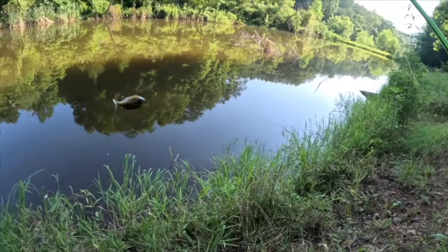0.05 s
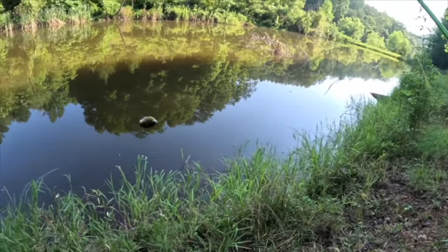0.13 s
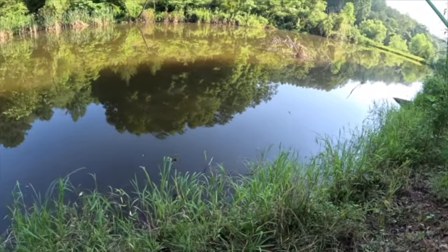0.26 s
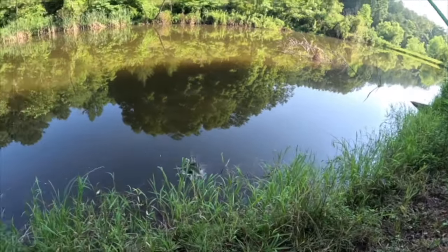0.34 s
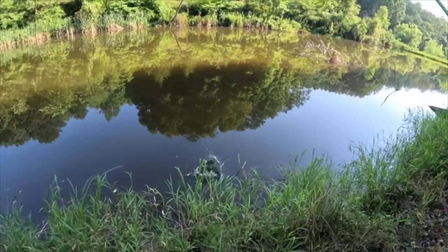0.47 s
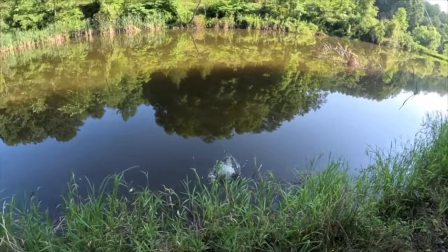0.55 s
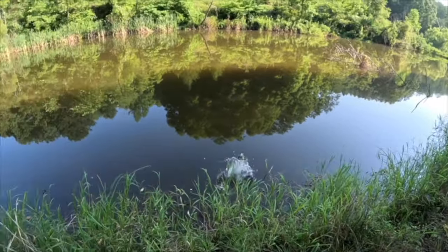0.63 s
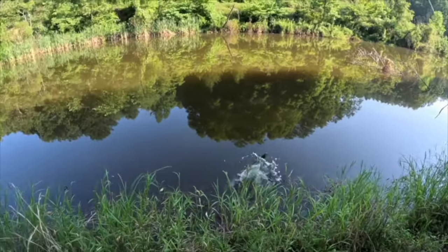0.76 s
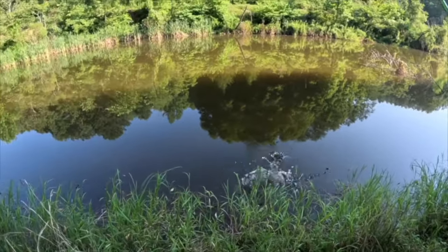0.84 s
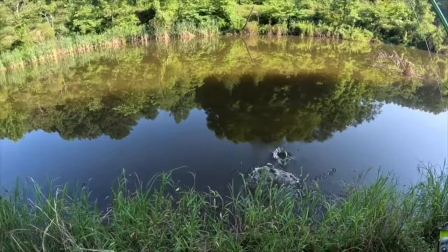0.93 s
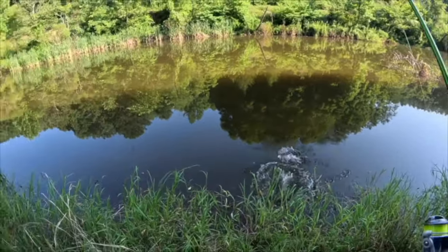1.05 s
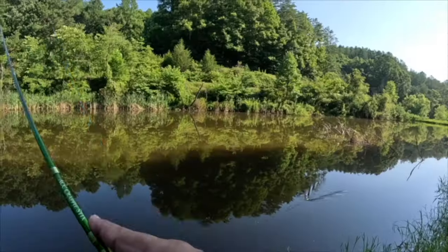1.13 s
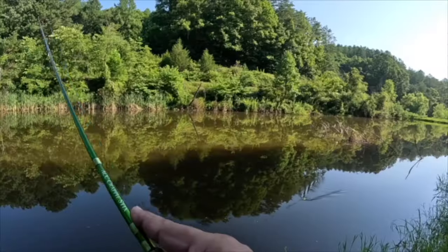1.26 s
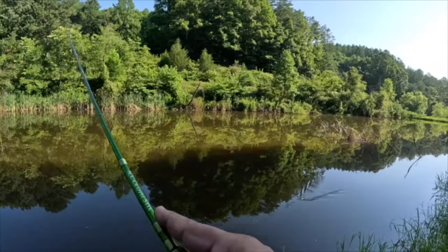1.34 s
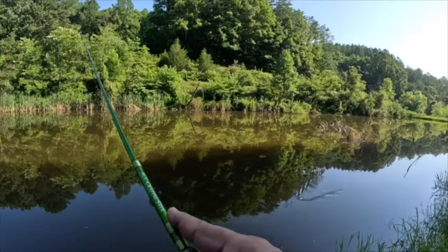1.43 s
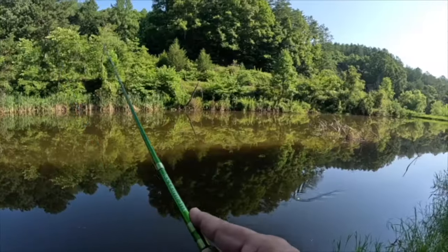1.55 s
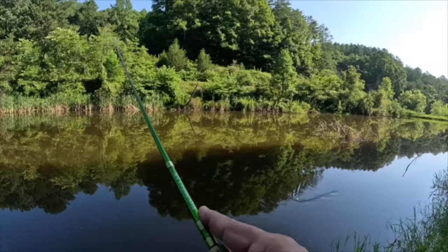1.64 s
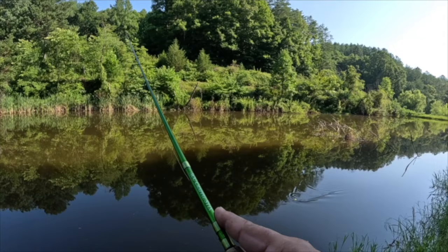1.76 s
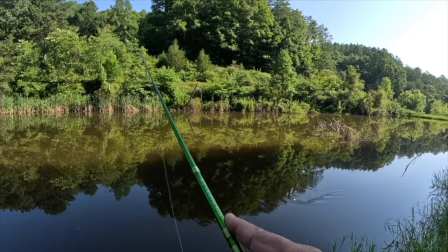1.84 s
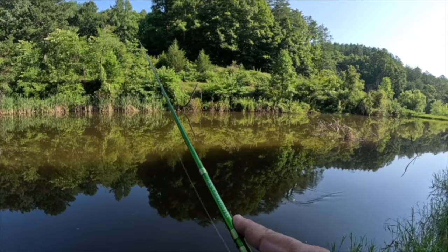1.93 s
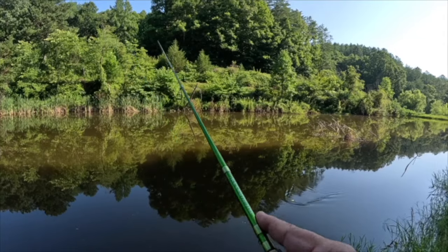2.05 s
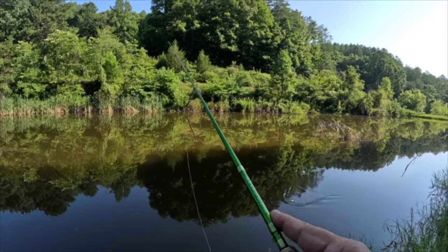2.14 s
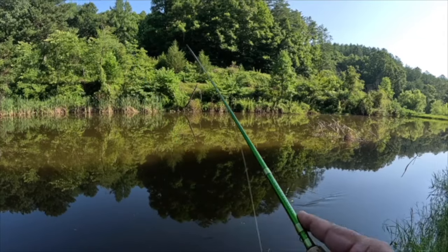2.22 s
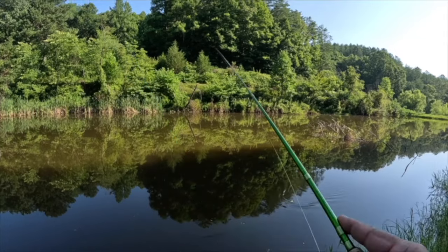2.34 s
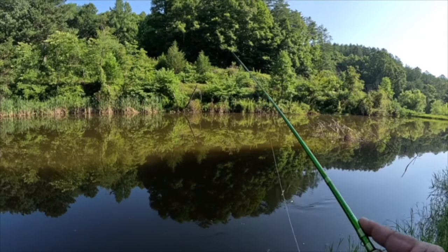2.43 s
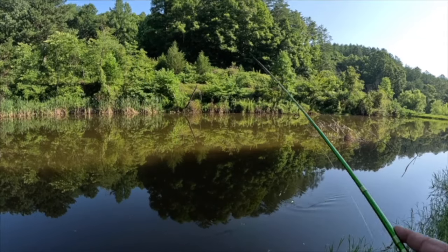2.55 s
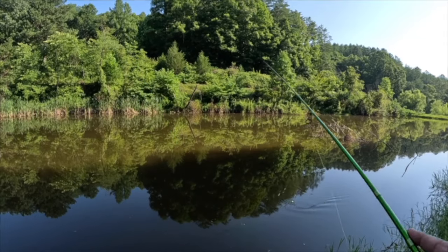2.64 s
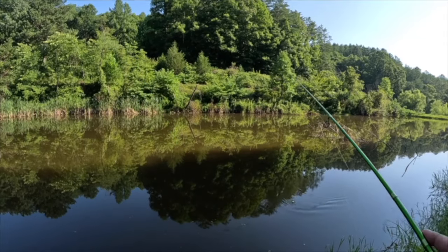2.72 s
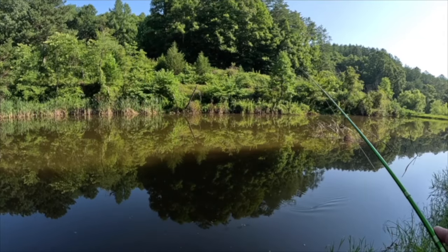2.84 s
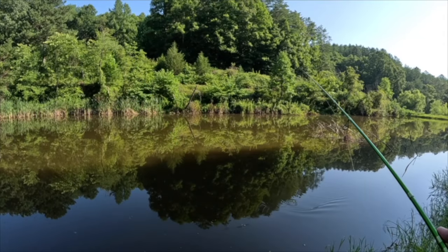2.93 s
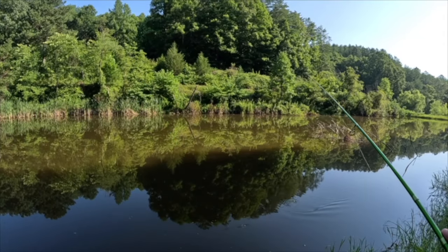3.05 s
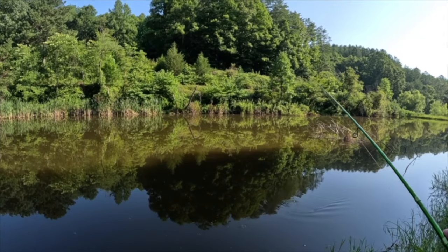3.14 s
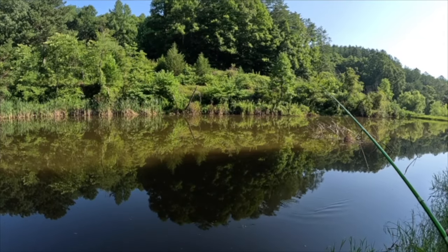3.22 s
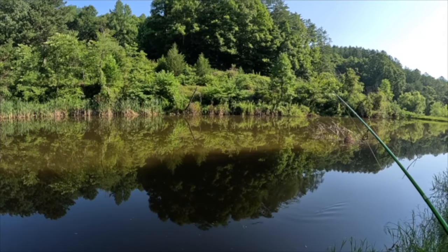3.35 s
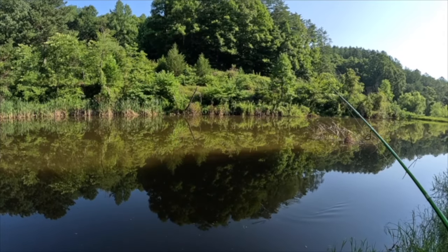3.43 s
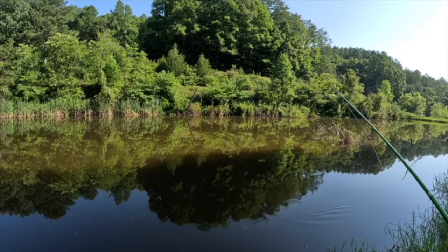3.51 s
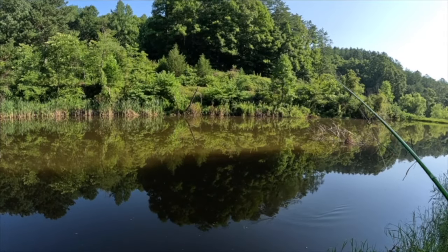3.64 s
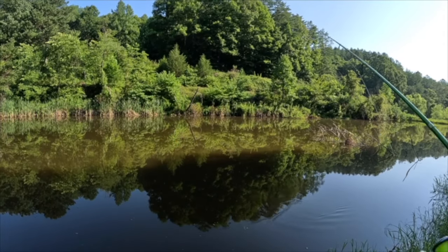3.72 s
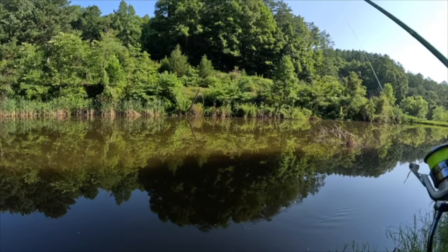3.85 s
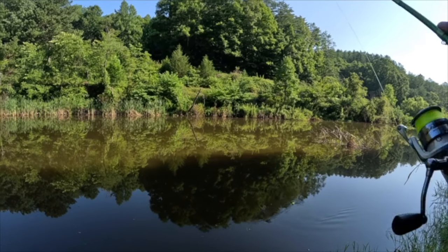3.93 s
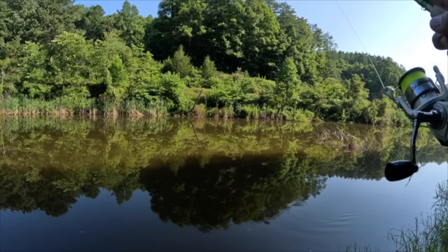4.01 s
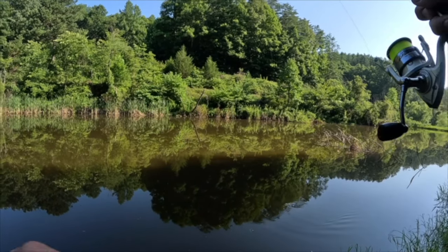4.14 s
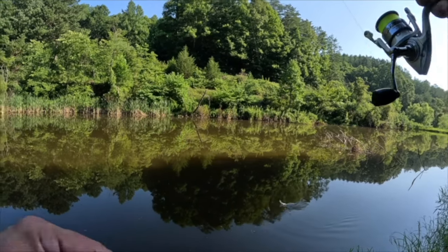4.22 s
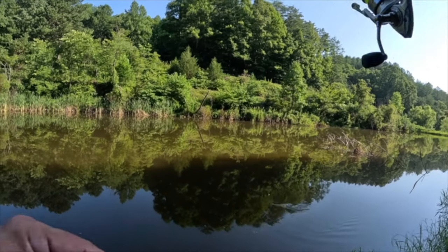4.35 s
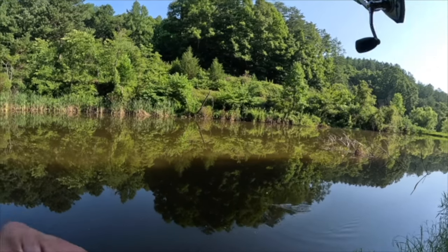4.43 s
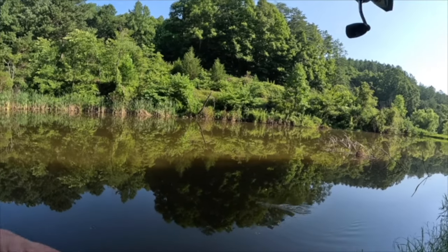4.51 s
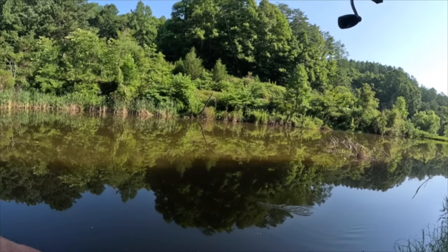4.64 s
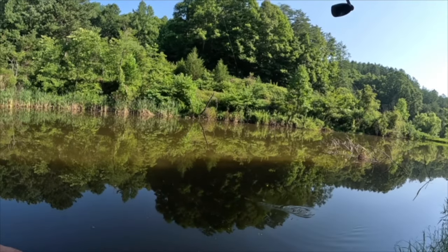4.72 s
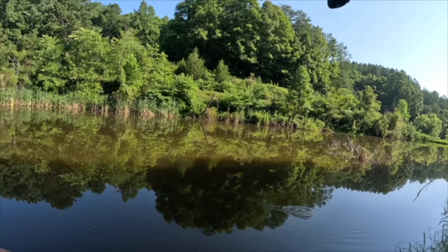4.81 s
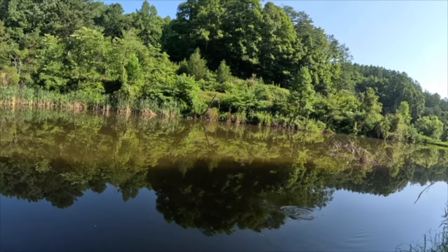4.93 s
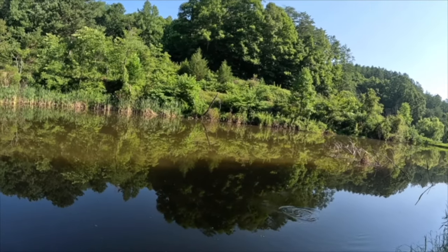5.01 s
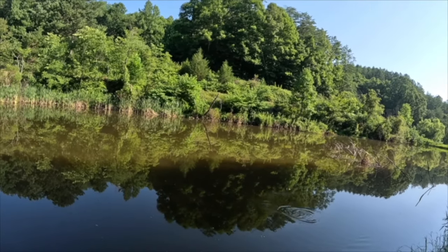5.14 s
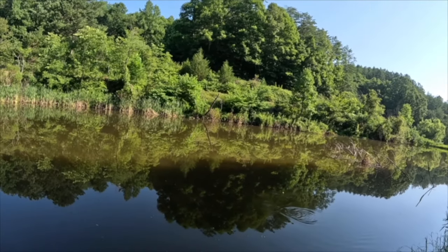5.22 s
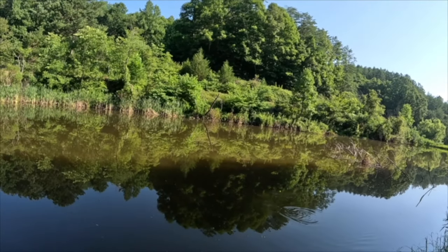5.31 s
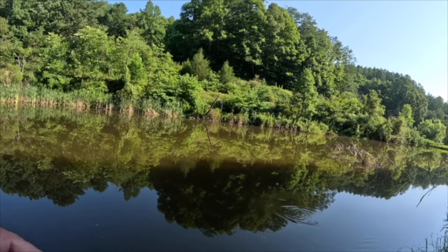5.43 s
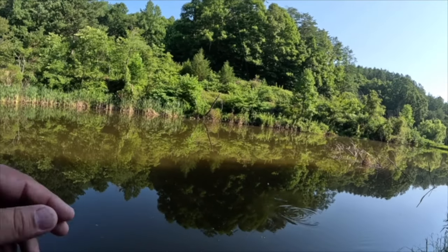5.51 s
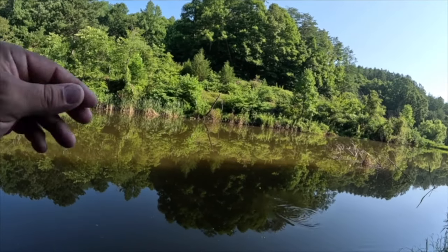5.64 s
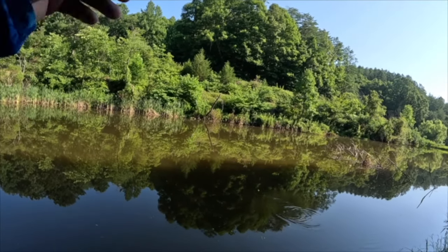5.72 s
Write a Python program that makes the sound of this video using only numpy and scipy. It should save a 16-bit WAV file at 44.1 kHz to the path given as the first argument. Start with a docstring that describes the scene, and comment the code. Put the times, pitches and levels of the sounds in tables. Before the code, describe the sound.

Loud close splash and spray cut abruptly to a calm pond bank: thin insect drone, soft bird notes, small rod clicks and distant plops.

```python
"""Fish tossed back into a pond

A fish slaps the surface in sharp noise bursts, air pockets gulp shut as gliding sines, and thrown water
rains back as ringing grains. Then a jump to a calm bank: insects in shaped noise, a pulsed frog trill, a bird
of gliding sines, a fish swirling farther out in small plops, rod and reel clicks from excited resonances,
and a far cricket. A light breeze of low noise runs under both places."""
import sys
import numpy as np
from scipy import signal
from scipy.fft import rfft, irfft
from scipy.io import wavfile
from scipy.ndimage import uniform_filter1d

SR = 44100
rng = np.random.default_rng(int(sys.argv[2]) if len(sys.argv) > 2 else 0)


def to_wav(sig):
    """Store sig (one row per channel, or 1-D mono) as 16-bit WAV at the path in sys.argv[1].

    Samples outside -1..1 are clipped; the rate is SR.
    """
    pcm = np.clip(np.atleast_2d(sig), -1, 1) * 32767
    pcm = np.round(pcm).astype(np.int16)
    wavfile.write(sys.argv[1], SR, pcm.T)  # frames by channels


N = 254456
TIME = np.arange(N) / SR  # s
BINS = np.maximum(np.arange(N // 2 + 1) * SR / N, 1)  # Hz
CHANGE_S = 1.175  # the scene jumps to a second spot on the bank

# Fish hitting the water: start_s, peak_db, decay_s, brightness_hz
SLAP_HITS = [(0.309, -13.5, 0.0019, 8970), (0.3206, -10, 0.0013, 6000), (0.3442, -19.5, 0.0011, 6960),
             (0.351, -22, 0.0029, 2453), (0.457, -16, 0.01, 4000), (0.475, -16, .009, 3003),
             (0.497, -26, 0.0034, 4450)]
# Resonances of the slapped water: centre_hz, width_hz, level_db
SLAP_RESONANCES = [(320, 280, -5), (1210, 350, -0.5), (2600, 750, -8), (4300, 550, -1.5), (9000, 2200, -12)]
# Fat drops that smack on the surface and ping briefly: start_s, pitch_hz, peak_db
FAT_DROPS = [(.638, 7000, -33), (.7715, 4600, -26), (.811, 2700, -28), (.82, 3700, -26.5),
             (.841, 3200, -29.5), (.857, 8000, -29), (.8615, 4700, -28), (0.875, 4300, -26.5),
             (.9365, 5300, -27), (0.9705, 5200, -27)]
SMACK_DECAY_S = 0.001
PING_SWELL_S, PING_DB = 0.0016, -8  # ping level against its smack
# Large air pockets: start_s, pitch_hz, peak_db, swell_s
AIR_POCKETS = [(0.4053, 1620, -25.5, 0.002), (.447, 990, -17, 0.003), (0.448, 420, -22.5, 0.0031),
               (0.4558, 350, -10.5, 0.0046), (0.453, 1310, -18.5, 0.0032), (0.4776, 364.8, -7.5, 0.003),
               (.472, 250, -17, 0.0044), (.497, 218.1, -30, 0.0099), (0.514, 1563, -25, .004),
               (.5585, 784, -20.5, 0.006), (.574, 702, -30, 0.0053), (.562, 125, -31.5, 0.0034),
               (.6615, 1410, -30, 0.0025), (.748, 434, -39.5, 0.0072), (.758, 1240, -33, 0.0011),
               (0.859, 1036, -28.5, 0.0053), (.913, 676, -29, 0.003), (.925, 1110, -26.5, 0.003),
               (.932, 927, -22, 0.0026), (0.973, 363, -35, 0.0069), (.986, 488, -31, 0.0093),
               (0.992, 1810, -33, 0.002), (1.03, 332, -46.5, 0.015), (1.07, 738, -41.5, 0.0072),
               (1.121, 1840, -29.5, 0.0013)]
POCKET_GLIDE = -0.012  # octaves per swell
# Water plunging in, stirring small bubbles and throwing spray: peak_s, bubbles_db, spray_db
PLUNGING_WATER = [(0.355, -40, -35.5), (0.406, -37, -44.5), (0.456, -28, -29), (0.48, -27, -33),
                  (0.497, -50, -31), (.522, -31, -55), (0.563, -28, -55), (0.61, -37, -47),
                  (0.764, -35.5, -66), (0.864, -53, -36.5), (0.922, -28.5, -39.5), (0.972, -31, -44),
                  (1.122, -66, -47), (1.166, -45.5, -50)]
PLUNGE_RISE_S, PLUNGE_FALL_S = 0.012, 0.017
# Spray torn off by a slap; level against the slap's peak
TEAR_DB, TEAR_RISE_S, TEAR_FALL_S = -19.5, 0.0006, 0.016
# Thrown water rains back, thickens to a peak and dies away
SHOWER_START_S, SHOWER_PEAK_S = 0.5, 0.98
SHOWER_RISE_DB_PER_S, SHOWER_FALL_DB_PER_S = 17, 125
SHOWER_SPRAY_DB, SHOWER_GURGLE_DB = -40.5, -40
# Colour of the small bubbles under the surface: pitch_hz, density_db_per_hz
GURGLE_COLOUR = [(220, -16.5), (400, -13.5), (620, -15), (950, 2), (1550, -4.5), (2200, -15.5)]
# Colour of the airborne spray: pitch_hz, density_db_per_hz
SPRAY_COLOUR = [(2000, 7.5), (2800, 3), (4100, 8), (5300, 2.5), (6200, -16.5), (8500, -5.5), (10500, -24.5),
                (14000, -50)]
# Colour of the deep churn: pitch_hz, density_db_per_hz
DEEP_COLOUR = [(170, -2), (300, -1), (520, -3.5)]
# The cavity heaves once as it closes
DEEP_DB, DEEP_PEAK_S, DEEP_RISE_S, DEEP_FALL_S = -28, 0.472, 0.017, 0.035
WATER_LOW_HZ = 140  # low cut of the splash

# Small plops of a fish farther out: start_s, length_s, pitch_hz, glide_octaves, level_db
SWIRL_PLOPS = [(3.929, 0.028, 753, 0.044, -49.5), (3.986, 0.039, 672, 0.073, -55.5),
               (4.05, 0.027, 726, 1, -54), (4.074, 0.017, 1590, 0.98, -46),
               (4.135, 0.0084, 1440, -0.12, -47.5), (4.186, 0.0093, 1760, 0.12, -51),
               (4.202, 0.0053, 1417, -.1, -47)]
# Little flicks of water around the plops: start_s, length_s, level_db
SWIRL_RIPPLES = [(3.917, .018, -53.5), (3.975, 0.032, -55.5), (4.082, 0.011, -52.5), (4.18, 0.032, -55),
                 (4.11, 0.22, -62.5)]
# Colour of the flicked water: pitch_hz, density_db_per_hz
SPATTER_COLOUR = [(900, 1), (1800, -1), (3600, -2.5)]

# Rod and reel clicks: start_s, peak_db, ring_hz
TACKLE_CLICKS = [(1.505, -34, 596), (1.6294, -28.5, 1400), (1.7108, -38.5, 590), (1.753, -36, 2480),
                 (1.7602, -24.5, 2376), (2.036, -39, 1450), (2.662, -39.5, 1040), (2.684, -43, 1610),
                 (2.7453, -35, 690), (4.8757, -21, 3780), (4.8848, -24.5, 3120), (4.888, -27.5, 3060),
                 (5.0224, -31, 4560), (5.245, -36.5, 3630), (5.2802, -27.5, 3490)]
# Resonances of the reel housing: centre_hz, width_hz, level_db
REEL_RESONANCES = [(1394, 650, 1), (4000, 1220, 4), (9900, 1100, -9.5)]
# The hand rubs on the rod grip: start_s, length_s, level_db
GRIP_RUBS = [(.19, 0.13, -55), (5.35, 0.029, -59.5)]
KNOCK_HZ = 420  # below this pitch the ring outweighs the tick
RING_CYCLES = 10.6  # cycles until a ring is 60 dB down
CONTACT_RATIO = 2.6  # top of the contact over the ring pitch: heavier parts meet more softly

# Arched bird notes: start_s, length_s, pitch_hz, glide_octaves, end_sag_octaves, level_db
BIRD_NOTES = [(1.464, 0.035, 3040, 0.16, 0.11, -53), (1.508, 0.03, 2840, -0.3, 0.14, -55),
              (1.771, 0.037, 2670, 0.054, 0.093, -54), (2.014, 0.025, 2528, -0.12, 0.1, -51),
              (2.048, 0.027, 2900, -0.024, 0.15, -57.5), (2.16, 0.052, 2330, 0.48, 0.29, -61),
              (2.285, 0.046, 2514, 0.026, 0.016, -53.5), (2.524, 0.028, 2517, 0.016, 0.021, -51.5),
              (2.571, 0.028, 3000, 0.11, .3, -49.5), (2.769, 0.034, 2520, 0.19, 0.073, -52),
              (2.916, 0.026, 2150, 0.08, 0.08, -59), (3.074, 0.029, 2380, 0.019, .13, -55),
              (3.169, 0.031, 2304, -0.059, 0.219, -59.5), (3.24, 0.0387, 4230, 0.12, 0.074, -56.5),
              (3.33, 0.019, 2750, 0.44, 0.01, -59.5), (3.402, 0.04, 2540, 0.075, 0.032, -52.5),
              (4.983, 0.037, 2920, 0.21, 0.16, -53), (5.381, 0.039, 2500, 0.33, 0.015, -52.5),
              (5.42, 0.079, 2950, 0.16, 0.011, -59)]
# Bird flicks that dive and level out: start_s, length_s, start_hz, end_hz, level_db
BIRD_FLICKS = [(1.421, 0.033, 4400, 2870, -54.5), (1.973, 0.039, 3910, 2770, -48.5),
               (2.241, 0.033, 4190, 2730, -49.5), (2.739, 0.025, 3670, 2750, -50),
               (2.814, 0.02, 3200, 2340, -51), (2.985, .042, 4500, 2740, -50.5),
               (3.5, .022, 4500, 3700, -56), (4.954, 0.024, 4300, 2350, -50.5)]
FLICK_BEND, FLICK_SWELL = 1.7, 1.0  # exponents: curvature of the dive, growth of its amplitude

# Distant frog trills: start_s, length_s, level_db
FROG_TRILLS = [(1.177, 0.24, -67), (1.631, 0.22, -65.5), (1.984, 0.252, -65.5), (2.48, 0.25, -68)]

# Colour of the insects at the first spot: pitch_hz, density_db_per_hz
FIRST_CHORUS_COLOUR = [(2000, -13.5), (3150, -9), (5300, -8), (6900, -1.5), (9000, -16.5), (15000, -49.5)]
FIRST_CHORUS_DB = -53.5
# Colour of the far chorus at the second spot: pitch_hz, density_db_per_hz
CHORUS_COLOUR = [(2550, -6), (3300, -5.5), (4000, -4.5), (5000, -0.5), (5300, -4.5), (5700, -1), (6800, -8),
                 (7550, -6), (8100, -18.5), (10000, -27.5), (15000, -46)]
CHORUS_DB, FADE_DB_PER_S = -56, 1.02  # sinks slowly after the jump
# Colour of the nearer buzz: pitch_hz, density_db_per_hz
BUZZ_COLOUR = [(5600, -49), (6100, 8), (6500, 7), (6950, -8.5), (7800, -6), (8200, -17), (10000, -26),
               (12000, -73)]
# Colour of a lower band of the buzz: pitch_hz, density_db_per_hz
UNDERTONE_COLOUR = [(3300, 0.5), (3550, 6.5), (3800, -1)]
UNDERTONE_DB = -6.5  # against the main band
BUZZ_DB, BUZZ_HOLD_S, BUZZ_FADE_DB_PER_S = -57, 2.37, 9  # holds until 2.37 s, then winds down
# Colour of the thin whine: pitch_hz, density_db_per_hz
WHINE_COLOUR = [(5150, -20), (5480, 15.5), (5680, 11.5), (6050, 3.5)]
WHINE_DB, WHINE_SWELL_DB, WHINE_PEAK_S, WHINE_SWELL_S = -66, 4.5, 5.14, 0.95  # swells once
CRICKET_START_S, CRICKET_PER_S, CRICKET_HZ, CRICKET_DB = 5.07, 12.1, 2477, -67.5

# Colour of the breeze: pitch_hz, density_db_per_hz
BREEZE_COLOUR = [(14, 10), (32, -3), (50, -11.5), (80, -19.5)]
# The breeze drops to a lull and picks up again: time_s, level_db
BREEZE_LEVEL = [(.3, -56.5), (1.7, -59.5), (2.4, -72), (3.3, -67.5), (5.6, -62.5)]
# Colour of the far rumble: pitch_hz, density_db_per_hz
RUMBLE_COLOUR = [(70, -10.5), (115, -10), (160, 4.5), (390, -9.5), (700, -16)]
# Slow course of the far rumble: time_s, level_db
RUMBLE_LEVEL = [(1.2, -70.5), (1.6, -68.5), (2.6, -63), (3.1, -71), (3.6, -68.5), (5.5, -65.5)]
# Colour of the soft rustle: pitch_hz, density_db_per_hz
RUSTLE_COLOUR = [(400, -13.5), (800, -16), (1300, -8), (1900, -15), (2600, -12.5)]
# Slow course of the soft rustle: time_s, level_db
RUSTLE_LEVEL = [(1.25, -71), (1.6, -68), (2.65, -66.5), (3.2, -69), (3.52, -75.5), (3.8, -71), (4.3, -68.5),
                (4.7, -73), (5.6, -68.5)]

# Left-right likeness of wide noise: pitch_hz, correlation (1 = identical)
STEREO_LIKENESS = [(60, 0.67), (330, 0.79), (1500, 0.52), (3300, 0.4), (7500, 0.99)]
# Lean of wide noise to the left: pitch_hz, left_minus_right_db
STEREO_LEAN = [(330, -5), (700, -3.5), (2500, 3), (3400, -3.5), (8000, 0)]
# Phase between the two microphone ports: pitch_hz, left_lead_radians
PORT_LEAD = [(250, 0), (1000, -.85), (1550, -.45), (2100, -1.0), (3900, -.15), (7500, 0)]
CUTOFF_HZ = 14900


def from_db(db):
    """Decibels to gain."""
    return 10 ** (np.asarray(db) / 20)


def rms_one(x):
    """Scale to unit power."""
    return x / np.sqrt(np.mean(x ** 2) + 1e-20)


def in_time(rows):
    """Draw a level curve sample by sample from its (time, level) points."""
    s, level = np.transpose(rows)
    return np.interp(TIME, s, level)


def at_hz(points, hz):
    """Read a spectrum on a log-frequency axis."""
    points_hz, values = np.transpose(points)
    return np.interp(np.log(hz), np.log(points_hz), values)


def add(track, s, sound):
    """Mix a sound into a track at a time."""
    at = max(round(s * SR), 0)
    track[at:at + len(sound)] += sound[:N - at]


def pan(x, lean_db):
    """Mono to stereo with a level difference; positive leans left."""
    return x * from_db([[lean_db / 2], [-lean_db / 2]])


def drift(per_s):
    """Smooth random wander of rms 1."""
    smoothed = rfft(rng.standard_normal(N)) / (1 + (BINS / per_s) ** 2)
    return rms_one(irfft(smoothed, N))


def resonate(x, hz, width):
    """Two-pole resonance with gain 1 at its peak."""
    r = np.exp(-np.pi * width / SR)
    zeros = np.array([1, 0, -1]) * (1 - r * r) / 2
    poles = [1, -2 * r * np.cos(2 * np.pi * hz / SR), r * r]
    return signal.lfilter(zeros, poles, x + 1e-18)


def body(x, modes):
    """Parallel resonances with alternating signs."""
    return sum((-1) ** k * from_db(db) * resonate(x, hz, width)
               for k, (hz, width, db) in enumerate(modes))


def dull(x, hz, order=2):
    """Low-pass."""
    return signal.sosfilt(signal.butter(order, min(hz, SR / 2 - 1000), fs=SR, output="sos"), x)


def tone(hz):
    """Sine that follows a pitch curve by summing its phase."""
    return np.sin(2 * np.pi * np.cumsum(hz) / SR)


def wash(spectrum):
    """Stereo noise of many far sources, partly alike in both ears, rms 1."""
    mid, side = rfft(rng.standard_normal((2, N)))
    alike = np.clip(at_hz(STEREO_LIKENESS, BINS), -1, 1)
    signs = np.array([[1], [-1]])
    pair = np.sqrt(1 + alike) * mid + signs * np.sqrt(1 - alike) * side
    low_skirt = 1 / (1 + (spectrum[0][0] / BINS) ** 8)
    high_skirt = 1 / (1 + (BINS / spectrum[-1][0]) ** 8)
    colour = from_db(at_hz(spectrum, BINS) + signs * at_hz(STEREO_LEAN, BINS) / 2)
    return rms_one(irfft(pair * low_skirt * high_skirt * colour, N))


def grains(spectrum, per_s, cycles, spread_db, count, start_s=0):
    """Tiny bubbles born at random, each ringing about some cycles at its own pitch; level evened."""
    size = round((CHANGE_S + 0.1) * SR)
    births = (rng.random(size) < per_s / SR) * rng.choice([-1, 1], size)
    births = births * from_db(spread_db * np.minimum(rng.exponential(1, size), 3.5))
    dealt = rng.integers(0, count, size)  # which pitch each birth gets
    pitches = np.geomspace(spectrum[0][0], min(spectrum[-1][0], CUTOFF_HZ), count)
    rings = sum(from_db(at_hz(spectrum, hz)) * resonate(births * (dealt == k), hz, 2 * hz / cycles)
                for k, hz in enumerate(pitches))
    out = np.zeros(N)
    add(out, start_s, rings / np.sqrt(uniform_filter1d(rings ** 2, size=1500) + 1e-16))
    return out


def scatter(x, t60, top_hz):
    """Diffuse return from grass and trees: decaying noise, different in each ear."""
    age = TIME[:SR // 2]
    tail = dull(rng.standard_normal((2, len(age))), top_hz) * from_db(-60 * age / t60)
    tail = tail / np.sqrt(np.sum(tail ** 2) / 2)
    return signal.fftconvolve(x[None], tail, axes=1)[:, :N]


def swells(events, rise_s, fall_s):
    """Summed power of events that each rise and die exponentially."""
    return sum(from_db(2 * db) * np.exp(2 * np.minimum((TIME - s) / rise_s, (s - TIME) / fall_s))
               for s, db, *_ in events)


def bursts(events):
    """Level of sounds that fade in, hold and fade out."""
    level = np.zeros(N)
    for s, length, db in events:
        add(level, s, from_db(db) * signal.windows.tukey(round(length * SR), 0.5))
    return level


def splash():
    """Slaps, gulps, gurgle, and the patter of drops over a fine fizz, cut off at the jump."""
    gurgle_level, spray_level = churn()
    # bubbles under the surface lose their treble; drops on top keep more of it
    cloud = grains(GURGLE_COLOUR, per_s=1000, cycles=16, spread_db=2.5, count=44)
    gurgle = gurgle_level * dull(cloud, 2600, order=4)
    fizz = grains(SPRAY_COLOUR, per_s=7500, cycles=8.4, spread_db=-0.5, count=36)
    drops = grains(SPRAY_COLOUR, per_s=400, cycles=20, spread_db=3.5, count=28)
    # thrown water comes down in clumps
    clumps_db = 2.2 * drift(70) - 3.5
    spray = spray_level * from_db(clumps_db) * dull(drops + from_db(-1.0) * fizz, 11500, order=4)
    heave = np.sqrt(swells([(DEEP_PEAK_S, DEEP_DB)], DEEP_RISE_S, DEEP_FALL_S))
    deep_level = np.hypot(heave, from_db(-18) * gurgle_level)
    deep = deep_level * grains(DEEP_COLOUR, per_s=590, cycles=4.4, spread_db=-1.0, count=10)
    water = slaps() + smacks() + air_pockets(unrest=0.04) + deep + gurgle + spray
    water = signal.sosfilt(signal.butter(2, WATER_LOW_HZ, "high", fs=SR, output="sos"), water)
    wet = from_db(-15.5) * scatter(water, t60=0.11, top_hz=8000)
    return (pan(water, -0.6) + wet) * (TIME < CHANGE_S)


def slaps():
    """Each slap of the body is a sharp burst of torn water that dies in milliseconds."""
    out, age = np.zeros(N), TIME[:SR // 20]
    for s, db, decay, bright_hz in SLAP_HITS:
        noise = rng.standard_normal(len(age)) * np.exp(-age / decay)
        burst = dull(body(noise, SLAP_RESONANCES), bright_hz, order=1)
        add(out, s, from_db(db) * burst / np.abs(burst).max())
    return out


def air_pockets(unrest):
    """Air trapped by the plunge or a drop swells into a note as it pinches off; its shape bends the pitch."""
    out, age = np.zeros(N), TIME[:SR // 10]
    wobble = 1 + unrest * drift(100)
    pings = [(s, hz, db + PING_DB, PING_SWELL_S) for s, hz, db in FAT_DROPS]
    for s, hz, db, swell in [*AIR_POCKETS, *pings]:
        u = age / swell
        pitch = hz * 2 ** (POCKET_GLIDE * np.minimum(u, 3)) * wobble[round(s * SR):][:len(u)]
        add(out, s, from_db(db) * (u * np.exp(1 - u)) ** 2 * tone(pitch))
    return out


def smacks():
    """A fat drop breaks the surface with a short, broad crack around its pitch."""
    out, age = np.zeros(N), TIME[:SR // 20]
    for s, hz, db in FAT_DROPS:
        noise = rng.standard_normal(len(age)) * np.exp(-age / SMACK_DECAY_S)
        crack = resonate(resonate(noise, hz, hz / 2), hz, hz)
        add(out, s, from_db(db) * crack / np.abs(crack).max())
    return out


def churn():
    """Levels of small bubbles and of spray, fed by the slaps, the plunges and the returning shower."""
    late = TIME - SHOWER_PEAK_S
    shower_db = np.minimum(SHOWER_RISE_DB_PER_S * late, -SHOWER_FALL_DB_PER_S * late)
    shower = (TIME > SHOWER_START_S) * from_db(shower_db)
    plunges = np.sqrt(swells(PLUNGING_WATER, PLUNGE_RISE_S, PLUNGE_FALL_S))
    torn = swells([(s, db + TEAR_DB) for s, db, *_ in SLAP_HITS], TEAR_RISE_S, TEAR_FALL_S)
    flung = swells([(s, db) for s, _, db in PLUNGING_WATER], PLUNGE_RISE_S, PLUNGE_FALL_S)
    gurgle_level = np.hypot(plunges, from_db(SHOWER_GURGLE_DB) * shower)
    spray_level = np.hypot(np.sqrt(torn + flung), from_db(SHOWER_SPRAY_DB) * shower)
    return gurgle_level, spray_level


def swirl():
    """Plops that start at once, glide as the bubble nears the surface and die away, with a light spatter."""
    spatter = grains(SPATTER_COLOUR, per_s=900, cycles=16, spread_db=2, count=24, start_s=3.85)
    out = bursts(SWIRL_RIPPLES) * dull(spatter, 4500)
    for s, length, pitch, glide, db in SWIRL_PLOPS:
        u = np.linspace(0, 1, round(length * SR))
        shape = np.minimum(u * 10, 1) * np.sqrt(1 - u)
        add(out, s, from_db(db) * shape * tone(pitch * 2 ** (glide * (u - 0.5))))
    return pan(from_db(-2.5) * out, -1.4) + from_db(-17) * scatter(out, t60=0.18, top_hz=5000)


def tackle():
    """Each click excites the reel housing and one ring of the part touched; the grip sticks and slips."""
    out, age = np.zeros(N), TIME[:SR // 20]
    for s, db, hz in TACKLE_CLICKS:
        # an impulse with a little grit behind it
        contact = (age == 0) + 0.028 * rng.standard_normal(len(age)) * np.exp(-age / 0.005)
        tick = dull(body(contact, REEL_RESONANCES), min(CONTACT_RATIO * hz, 9000), order=1)
        ring = np.sin(2 * np.pi * hz * age) * from_db(-60 * age * hz / RING_CYCLES)
        click = tick / np.abs(tick).max() + np.sqrt(KNOCK_HZ / hz) * ring
        add(out, s, from_db(db) * click / np.abs(click).max())
    slips = (rng.random(N) < 600 / SR) * rng.standard_normal(N)
    out += bursts(GRIP_RUBS) * rms_one(dull(body(slips, REEL_RESONANCES), 1950))
    return pan(out, -0.59) + from_db(-11.0) * scatter(out, t60=0.05, top_hz=6000)


def bird():
    """A songbird in the trees: diving flicks and arched notes with a slight flutter, and their echo."""
    song = whistles(BIRD_NOTES, waver=0.014)
    for s, length, start_hz, end_hz, db in BIRD_FLICKS:
        u = np.linspace(0, 1, round(length * SR))
        hz = end_hz * (start_hz / end_hz) ** ((1 - u) ** FLICK_BEND)
        shape = u ** FLICK_SWELL * signal.windows.tukey(len(u), 0.4)
        add(song, s, from_db(db) * shape * tone(hz))
    song = song * from_db(2.0 * drift(90))
    return pan(from_db(-0.5) * song, 7.5) + from_db(-14) * scatter(song, t60=1.0, top_hz=5000)


def whistles(notes, waver):
    """Near-sines that glide, each bowed upward by its own arch."""
    out, wobble = np.zeros(N), 1 + waver * drift(300)
    for s, length, pitch, glide, arch, db in notes:
        u = np.linspace(-1, 1, round(length * SR))
        hz = pitch * 2 ** (glide * u / 2 - arch * u ** 2) * wobble[round(s * SR):][:len(u)]
        shape = np.sqrt(np.abs(np.cos(np.pi * u / 2)))
        add(out, s, from_db(db) * shape * tone(hz))
    return out


def frog():
    """Short trills from across the water: banded noise pulsed 45 times a second."""
    pulses = 1 + 0.5 * np.sin(2 * np.pi * 45 * TIME)
    return bursts(FROG_TRILLS) * pulses * wash([(1150, -31), (1400, 21), (1540, 14), (1780, -25)])


def insects():
    """One chorus before the jump; then a far chorus, a nearer buzz in quick syllables, and a thin whine."""
    buzz_db = BUZZ_DB - BUZZ_FADE_DB_PER_S * np.maximum(TIME - BUZZ_HOLD_S, 0)
    whine_db = WHINE_DB + WHINE_SWELL_DB * np.exp(-((TIME - WHINE_PEAK_S) / WHINE_SWELL_S) ** 2)
    # about 13 syllables a second, each with a softened gap over its first fifth
    syllable = np.cumsum(13.0 * (1 + 0.015 * drift(2))) / SR % 1
    gaps = 1 - dull(1.0 * (syllable < 0.2), 120)
    strokes = 1 + 0.46 * tone(395 * (1 + 0.0194 * drift(8.4)))
    bands = wash(BUZZ_COLOUR) + from_db(UNDERTONE_DB) * wash(UNDERTONE_COLOUR)
    buzz = from_db(buzz_db) * gaps * strokes * bands
    whine = from_db(whine_db + 1.8 * drift(44)) * wash(WHINE_COLOUR)
    chorus_db = CHORUS_DB - FADE_DB_PER_S * np.maximum(TIME - CHANGE_S, 0)
    chorus = from_db(chorus_db + 0.5 * drift(26.0)) * wash(CHORUS_COLOUR)
    first_chorus = from_db(FIRST_CHORUS_DB) * wash(FIRST_CHORUS_COLOUR)
    return np.where(TIME < CHANGE_S, first_chorus, buzz + whine + chorus)


def cricket():
    """Faint, even chirps of narrow noise around one pitch."""
    chirps = np.maximum(np.sin(2 * np.pi * CRICKET_PER_S * np.maximum(TIME - CRICKET_START_S, 0)), 0)
    noise = resonate(rng.standard_normal(N), CRICKET_HZ, 81)
    chirr = rms_one(resonate(noise, CRICKET_HZ, 81))
    return pan(from_db(CRICKET_DB) * np.sqrt(chirps) * chirr, 1.3)


def air():
    """Gusty breeze on the microphone, far rumble and soft rustle, each coloured noise on its level curve."""
    gusts_db = 3.5 * drift(6)
    breeze = from_db(in_time(BREEZE_LEVEL) + gusts_db) * wash(BREEZE_COLOUR)
    rumble = from_db(in_time(RUMBLE_LEVEL)) * wash(RUMBLE_COLOUR)
    rustle = from_db(in_time(RUSTLE_LEVEL)) * wash(RUSTLE_COLOUR)
    return breeze + rumble + rustle


def scene():
    """Everything at the pond."""
    return splash() + swirl() + tackle() + bird() + frog() + insects() + cricket() + air()


def record(dry):
    """Sound reaches the left port a little late; the top is cut steeply."""
    half = np.exp(0.5j * at_hz(PORT_LEAD, BINS))
    ports = irfft(rfft(dry) * np.array([half, 1 / half]), N)
    return signal.sosfilt(signal.ellip(10, 0.1, 80, CUTOFF_HZ, fs=SR, output="sos"), ports)


dry = scene()
out = record(dry)
to_wav(out)
```